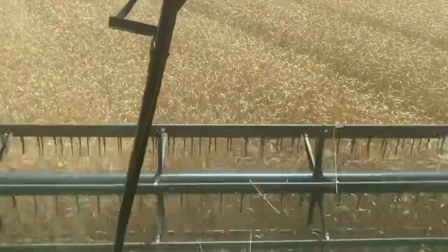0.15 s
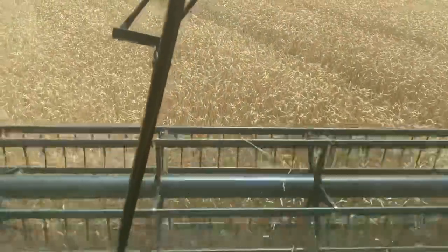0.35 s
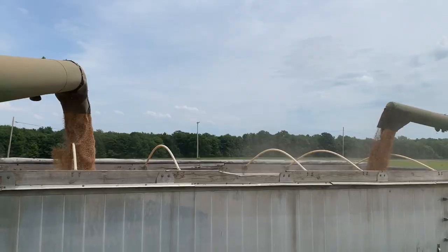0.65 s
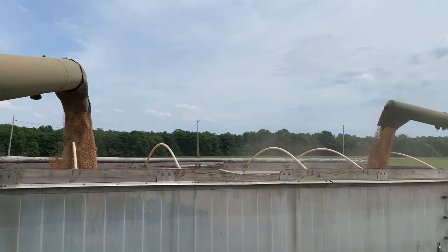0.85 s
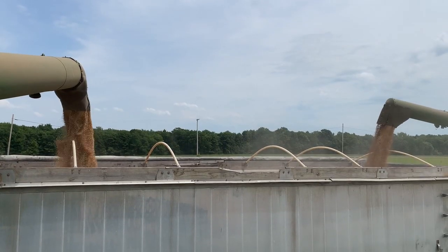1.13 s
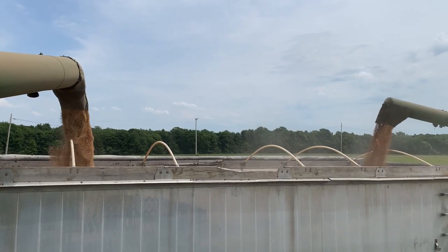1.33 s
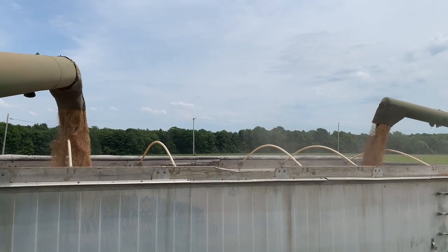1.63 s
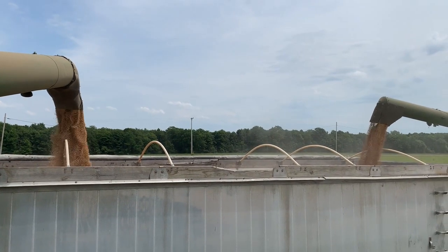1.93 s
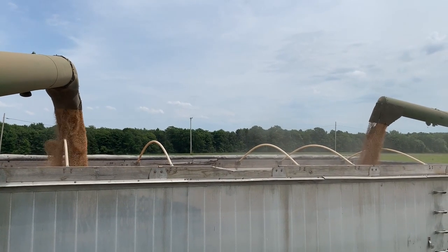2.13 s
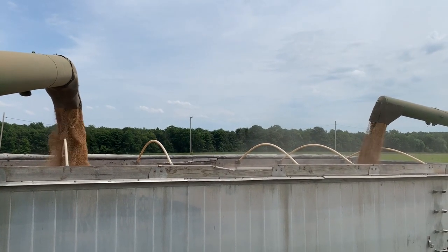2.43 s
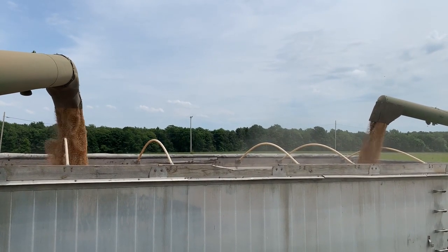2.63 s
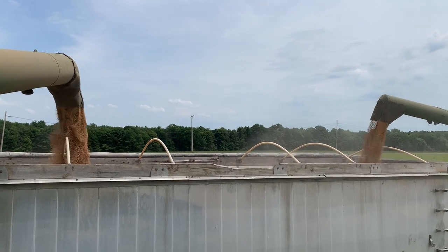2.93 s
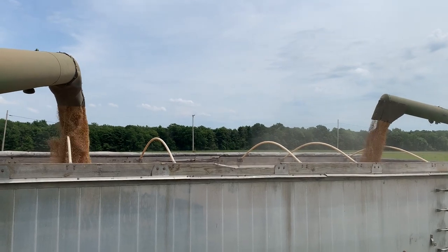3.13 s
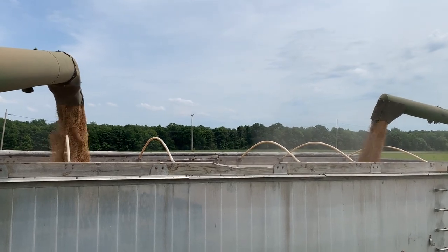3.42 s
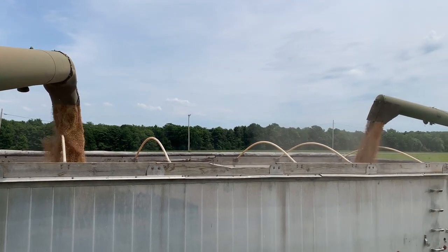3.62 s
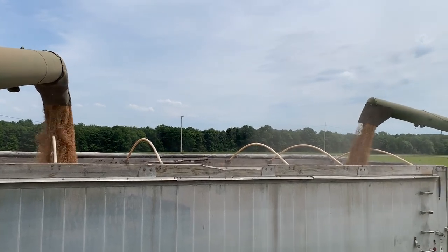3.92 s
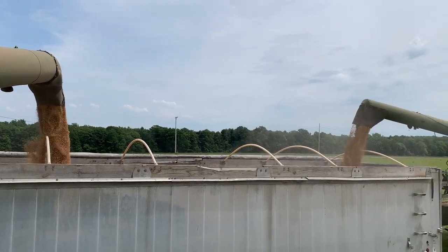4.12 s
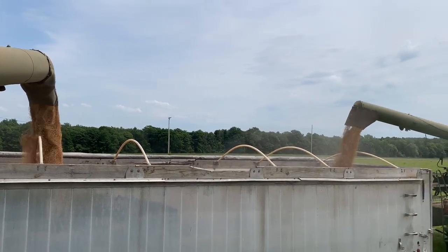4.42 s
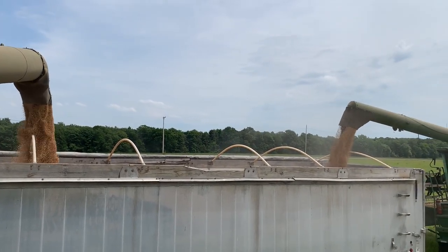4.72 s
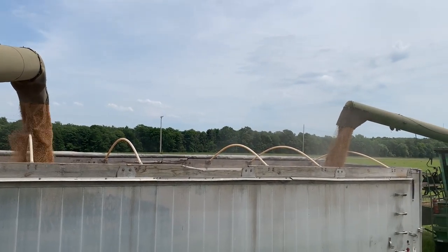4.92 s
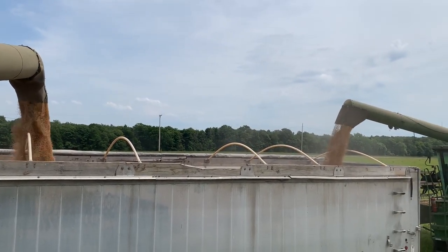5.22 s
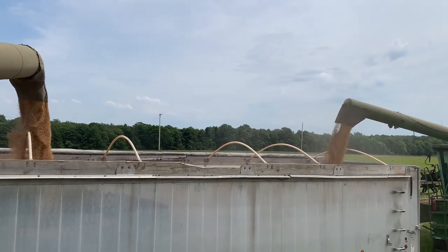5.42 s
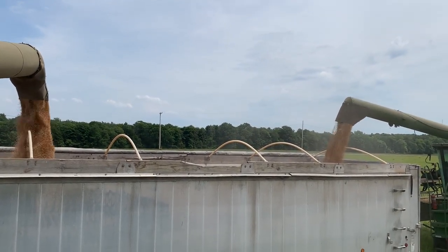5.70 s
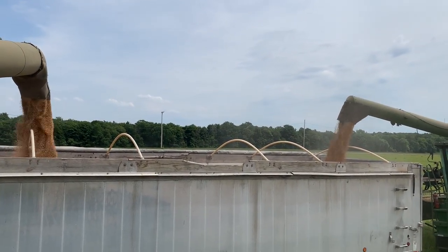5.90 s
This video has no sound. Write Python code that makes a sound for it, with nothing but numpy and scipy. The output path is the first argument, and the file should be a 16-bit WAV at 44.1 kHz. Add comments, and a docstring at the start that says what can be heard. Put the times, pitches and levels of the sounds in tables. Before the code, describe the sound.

For half a second, a muffled rumble with thin whines is heard inside a combine's cab. It cuts abruptly to an open field, beside a trailer that two combines are filling with wheat. Their unloading augers hum with a fast throb over steadily droning diesel engines. Grain scrapes and rings along the steel tubes with faint squeals, patters onto the heap and strikes the metal walls, continuing to the end.

```python
"""Two unloading augers hum at the tooth rates of their chain drives as two combines fill a trailer with wheat.
Each auger surges once a turn, and the unequal speeds make the surges beat. Kernels scrape and ring
along the steel tubes, patter onto the heap and strike the trailer's walls, over droning diesels.
The first half second is heard muffled inside a combine's cab, the rest outdoors beside the trailer."""
import sys
import numpy as np
from scipy import signal
from scipy.fft import rfft, irfft
from scipy.io import wavfile

SR = 44100
rng = np.random.default_rng(int(sys.argv[2]) if len(sys.argv) > 2 else 0)


def digitize_waveform(pressure):
    """Quantize a signal to 16-bit integers and store it at the path in sys.argv[1].

    Rows of a 2-D input are taken as channels; values are limited to [-1, 1].
    """
    field = np.atleast_2d(pressure).T
    bounded = np.clip(field, -1, 1)
    quanta = np.round(bounded * 32767).astype(np.int16)
    wavfile.write(sys.argv[1], SR, quanta)


N = 267025
TIME = np.arange(N) / SR
HZ = np.maximum(np.arange(N // 2 + 1) * SR / N, 1)

# left-right coherence outdoors: (frequency [Hz], coherence [-1 to 1])
FIELD_COHERENCE = [(80, .98), (150, .93), (260, .58), (400, .4), (700, .5), (950, .2), (1200, .55),
                   (1400, .55), (2200, .22), (3600, .1), (5000, .2), (6100, .15), (7300, .45), (8300, .96),
                   (8800, .96), (9500, .8), (10200, .4), (10800, .3), (11400, -.6), (12100, .55),
                   (13000, .9), (14300, .9), (15200, 0)]
# phase lead of the left channel outdoors: (frequency [Hz], lead [rad])
FIELD_LEAD = [(50, .15), (250, .25), (400, .85), (700, 1.6), (1200, 3.1), (1700, 3.6), (2200, 5.6),
              (3300, 9.3), (4400, 12.6), (5500, 15), (6800, 12.8), (8500, 9.4), (10800, 6.28)]
# level difference outdoors: (frequency [Hz], left minus right [dB])
FIELD_BALANCE = [(50, 1), (130, 2.6), (240, 1.8), (370, 5), (600, 4), (1000, 1), (2600, 1), (4200, 0),
                 (5700, -3), (7500, 0), (15000, 0)]
# left-right coherence in the cab: (frequency [Hz], coherence [-1 to 1])
CAB_COHERENCE = [(60, 1.0), (300, 0.59), (700, 0.053), (1300, 0)]
# rumble in the cab: (frequency [Hz], spectral density [dB re 1/Hz])
CAB_RUMBLE = [(10, -70), (22, -50), (40, -41.5), (70, -42), (110, -41), (175, -50.5), (300, -53.5),
              (450, -60.5), (800, -63.5), (980, -69), (1150, -71), (1600, -76.5), (2600, -76),
              (4300, -88.5), (8000, -98), (15000, -89.5)]
# hydraulic whines in the cab: (frequency [Hz], level [dB])
CAB_WHINES = [(140, -55), (502, -42), (737.5, -41), (848, -51)]
# contacts of a loose panel: (time [s], level [dB])
PANEL_CONTACTS = [(.216, -22), (.311, -30)]
# modes of that panel: (frequency [Hz], peak relative to the contact [dB])
PANEL_MODES = [(1085, -2), (1529, -13), (2008, -12), (2560, -14)]
# fans, exhausts and threshing gear: (frequency [Hz], spectral density [dB re 1/Hz])
ROAR_SPECTRUM = [(40, -59), (62, -52), (80, -40.5), (91, -46), (103, -40.5), (135, -41), (175, -47),
                 (260, -47.5), (300, -45), (340, -49.5), (430, -50), (510, -54.5), (950, -59), (1100, -58),
                 (1190, -60), (1280, -59.5), (2000, -66.5), (5000, -109)]
# cavity resonances of the trailer: (frequency [Hz], bandwidth [Hz], gain [dB])
TRAILER_MODES = [(611, 28, 2.5), (705, 14, 4), (806, 20, 6), (851, 9.8, 2.5), (950, 53, 3.5), (1058, 28, 4)]
# tones of engines, shafts and fans:
# (frequency [Hz], level before trim [dB], left minus right [dB], waver [rad of phase and dB of level])
ENGINE_TONES = [(71.5, -39, 2, .3), (187.1, -32.5, 2, .25), (225.2, -41, 2, .4), (239.2, -37.5, -2, .3),
                (241.8, -40, -2, .3), (253.4, -40, 1, .3), (557.6, -47.5, 4, .4), (753, -52, 2, .3),
                (794.7, -41, 2.5, .2), (931, -49, 2, .5), (1031.8, -46, -5, .4), (1082, -48, 5, .5),
                (1393.4, -49.5, 1, .35)]
# deep hum of each diesel: (frequency [Hz], level [dB])
DIESEL_HUMS = [(84.45, -22.3), (83.65, -35)]
# ringing of the trailer's walls: (frequency [Hz], spectral density [dB re 1/Hz])
WALL_SPECTRUM = [(1150, -65), (1600, -67), (2700, -68.5), (3400, -71), (4600, -70.5), (5600, -74)]
# kernels scraping in the tubes: (frequency [Hz], spectral density [dB re 1/Hz])
SCRAPE_SPECTRUM = [(300, -54.5), (900, -65), (1550, -69), (2200, -71), (2700, -67.5), (3300, -71),
                   (6000, -76.5), (12000, -99)]
# kernels landing on the heap: (frequency [Hz], spectral density [dB re 1/Hz])
PATTER_SPECTRUM = [(700, -67.5), (2500, -76), (3600, -71), (4250, -72), (4850, -71), (5250, -74),
                   (5700, -70.5), (6200, -67.5), (7700, -76.5), (12000, -102)]
# fine high hiss, strongest in three narrow bands: (frequency [Hz], spectral density [dB re 1/Hz])
HISS_SPECTRUM = [(4000, -88), (7000, -79), (8200, -74), (9400, -74), (9850, -66.5), (10500, -74),
                 (11200, -79), (12000, -73.5), (12850, -68.5), (13450, -81), (14200, -69.5), (15200, -77)]
# modes of the steel tubes: (frequency [Hz], level before trim [dB], share in a squeal [0-1])
TUBE_MODES = [(1243, -47, 0), (1285, -44.5, 0), (1438, -50, 0), (1558, -52, 0), (1662, -52, 0),
              (1835, -48.5, .3), (1905, -49.5, .3), (1993, -50, .2), (2050, -53, 0), (2368, -47.5, 1),
              (2396, -48.5, 1), (2422, -52, .7), (2465, -49.5, .6), (2635, -52, .2), (2812, -54, 0),
              (2922, -54, 0), (3135, -56, 0), (3450, -57, 0), (4175, -54.5, 0), (4285, -56, 0),
              (5195, -54.5, 0)]
# clumps of grain in the tubes: (time [s], added load [dB], squeal at full share [dB])
GRAIN_CLUMPS = [(0.91, .7, 3.5), (1.1, 0.6, 2.5), (1.24, -0.6, 1), (1.57, 0.5, 4), (1.69, 1, 4.5),
                (1.89, 1.5, 1.5), (2.19, 1.7, 2.5), (3.06, 1.2, 3), (3.39, 0, 3.5), (3.85, 1.4, 4),
                (4.03, 2.3, 3), (4.34, 0.8, 2.5), (4.57, 0.5, 0), (4.77, 2.1, 0), (5.06, 1, 0),
                (5.21, 1.6, 4.5), (6.02, 0, 4)]
# uneven running of the drive, once and twice a lap of a slack chain and once a turn of the slower shaft: (rate
# [Hz], time when furthest ahead [s], phase swing [rad], added bite [dB])
DRIVE_SWAY = [(.93, 1.345, .28, 0), (1.86, .82, .2, 2.8), (3.715, .68, .22, 1.1)]
# the augers: (turn rate [Hz], time of one surge [s], tooth rate [Hz], level before trim [dB],
# fall per harmonic [dB], surge depth [0-1], chain slack [0-1])
AUGER_DRIVES = [(6.043, .552, 139.02, -22.3, 5.5, .38, 1), (6.51, .622, 149.26, -28, 12, .2, 0)]
# chain hum: (harmonic [number], trim [dB], throb per unit surge depth [Np], lag of phase wobble [s])
CHAIN_HARMONICS = [(1, 2.5, 1.0, .02), (2, 3.0, .5, .0455), (3, 3.0, 1.74, -.022), (4, -6, .81, .0029)]

OUTDOORS_S, CUTOFF_HZ, WIND_FILTER_HZ = .4845, 15200, 48.6
BOOM_HZ, BOOM_DB, BOOM_THROB_DB = 115, -31, 7.5
ENGINE_LEAD_S = 0.000084  # the engines stand a little to the left
PANEL_T60_S, WALL_T60_S, TUBE_T60_S = .064, .11, .12
SHAFT_TURN_HZ, SHAFT_PUSH_S = 3.71, .565  # a slower shaft loads the drive twice a turn
GRIND_CEILING_DB = 2.1  # a full tube takes no more, even when both augers surge together
SQUEAL_FOLLOW = 2.2  # the squealing modes follow the load more closely than the rest


def from_db(db):
    """Amplitude grows tenfold for every 20 dB."""
    return 10 ** (np.asarray(db) / 20)


def over_hz(points):
    """A (frequency, value) table interpolated on a logarithmic frequency axis."""
    hz, value = np.transpose(points)
    return np.interp(np.log(HZ), np.log(hz), value)


def drift(corner_hz):
    """Low-passed noise gives a slow random fluctuation of unit variance."""
    step = 40  # samples per slow value
    pole = np.exp(-2 * np.pi * corner_hz * step / SR)
    slow = signal.lfilter([1], [1, -2 * pole, pole * pole], rng.standard_normal(N // step + 2002))[2000:]
    return np.interp(np.arange(N) / step, np.arange(len(slow)), (slow - slow.mean()) / slow.std())


def swing(hz, peak_s):
    """Sinusoidal modulation with a crest at the given time."""
    return np.cos(2 * np.pi * hz * (TIME - peak_s))


def tone(phase, db, pan_db, lead):
    """Level and phase differences between left and right localise a sinusoid of given rms level."""
    side = np.array([[.5], [-.5]])
    return np.sqrt(2) * from_db(db + side * pan_db) * np.cos(phase + side * lead)


def colour(white, spectrum_db, coherence, lead, pan_db):
    """Two independent white signals, filtered and mixed as mid and side, set spectrum and coherence."""
    first, second = rfft(white)
    coherence = np.clip(coherence, -.995, .995)
    mid, side = np.sqrt((1 + coherence) / 2) * first, np.sqrt((1 - coherence) / 2) * second
    leftward = from_db(pan_db / 2) * np.exp(.5j * lead)
    stereo = np.array([(mid + side) * leftward, (mid - side) / leftward])
    return irfft(stereo * from_db(spectrum_db) * np.sqrt(SR / 2), N)


def in_field(white, spectrum_db):
    """Coherence sets stereo width per band: centred bass, wide middle, treble by turns narrow and wide."""
    return colour(white, spectrum_db, over_hz(FIELD_COHERENCE), over_hz(FIELD_LEAD), over_hz(FIELD_BALANCE))


def impacts(per_s, flow, spread_db):
    """Shot noise of unit rms: impulses of uneven size arrive at random, at the rate per_s times flow."""
    sizes = from_db(spread_db * np.minimum(rng.exponential(1, (2, N)), 5)) * rng.choice([-1, 1], (2, N))
    clicks = sizes * (rng.random((2, N)) < per_s * flow / SR)
    return clicks / clicks.std()


def ring(strikes, hz, t60_s):
    """A damped mode answers each impulse with an exponentially decaying sinusoid."""
    radius, angle = from_db(-60 / (t60_s * SR)), 2 * np.pi * hz / SR
    return signal.lfilter([1, 0, -1], [1, -2 * radius * np.cos(angle), radius * radius], strikes)


def panel_ticks(contact_s=.0027):
    """Impact excitation: a loose panel chatters against its frame and rings in its modes."""
    out = 0
    for at, db in PANEL_CONTACTS:
        contact = np.exp(-.5 * ((TIME - at) / contact_s) ** 2)
        chatter = impacts(per_s=2600, flow=1, spread_db=5.0) * contact + 1e-18
        for hz, mode_db in PANEL_MODES:
            ringing = ring(chatter, hz, PANEL_T60_S)
            out = out + from_db(db + mode_db) * ringing / np.abs(ringing).max()
    return out


def cab(waver_rad=.71, flutter_db=.5):
    """Transmission loss: behind glass only rumble, a throbbing boom, whines and a ticking panel remain."""
    white = rng.standard_normal((2, N))
    rumble = colour(white, over_hz(CAB_RUMBLE), over_hz(CAB_COHERENCE), lead=0, pan_db=.5)
    boom_db = BOOM_DB + BOOM_THROB_DB * swing(hz=3.4, peak_s=.05)
    boom = tone(2 * np.pi * BOOM_HZ * TIME, boom_db, pan_db=8.0, lead=.2)
    whines = 0
    for hz, db in CAB_WHINES:
        phase = 2 * np.pi * hz * TIME + waver_rad * drift(2.5)
        whines = whines + tone(phase, db + flutter_db * drift(8.2), pan_db=5.0, lead=.37)
    return rumble + boom + whines + panel_ticks()


def machinery_roar(grind_db, follow=.18):
    """Cavity resonance: the hollow trailer colours broadband noise that swells slightly with the load."""
    peaks = sum((from_db(db) - 1) / (1 + (2 * (HZ - hz) / width) ** 2) for hz, width, db in TRAILER_MODES)
    noise = rng.standard_normal((2, N)) * from_db(follow * grind_db)
    return in_field(noise, over_hz(ROAR_SPECTRUM) + 20 * np.log10(1 + peaks))


def engine_drone(trim_db=.4):
    """Governed engines hold their pitch; moving air modulates each tone in phase and amplitude."""
    out = 0
    for hz, db, pan_db, waver in ENGINE_TONES:
        phase = 2 * np.pi * (hz * TIME + rng.random()) + waver * drift(2.4)
        lead = 2 * np.pi * hz * ENGINE_LEAD_S
        out = out + tone(phase, db + trim_db + waver * drift(5.6), pan_db, lead)
    return out


def diesel_hum(in_step_s=.92, pan_db=2.1):
    """Beats: two diesels run at almost one speed, so their summed hum slowly swells and ebbs."""
    return sum(tone(2 * np.pi * hz * (TIME - in_step_s), db, pan_db, lead=2 * np.pi * hz * ENGINE_LEAD_S)
               for hz, db in DIESEL_HUMS)


def wall_rings(grind_db, low_hz=1150, high_hz=5600, modes=56):
    """High modal density: each stray kernel rings one of the close modes of the trailer's sheet walls."""
    hits = impacts(per_s=650, flow=from_db(grind_db), spread_db=1.0)
    struck_mode = rng.integers(0, modes, N)
    pitches = low_hz + (high_hz - low_hz) * (np.arange(modes) + rng.random(modes)) / modes
    out = sum(ring(hits * (struck_mode == k) + 1e-9 * TIME, hz, WALL_T60_S) for k, hz in enumerate(pitches))
    band_share = (high_hz - low_hz) / (SR / 2)
    return in_field(out / out.std() * np.sqrt(band_share), over_hz(WALL_SPECTRUM))


def grain_stream(grind_db):
    """Dense impacts merge into noise: kernels scrape in surges and land steadily; a high hiss flickers."""
    scrape = impacts(per_s=7000, flow=from_db(2.4 * grind_db), spread_db=3.0)
    patter = impacts(per_s=14000, flow=from_db(.29 * grind_db), spread_db=2.0)
    hiss = impacts(per_s=12000, flow=from_db(.25 * grind_db + 3.0 * drift(30)), spread_db=.5)
    return (in_field(scrape, over_hz(SCRAPE_SPECTRUM)) + in_field(patter, over_hz(PATTER_SPECTRUM))
            + in_field(hiss, over_hz(HISS_SPECTRUM)))


def tube_rings(grind_db, squeal_db, follow=2.4, trim_db=3.0):
    """Random excitation: grain keeps the steel tubes' modes ringing, most densely in surges and squeals."""
    out = 0
    for hz, db, share in TUBE_MODES:
        flow = from_db((follow + share * SQUEAL_FOLLOW) * grind_db + 2 * share * squeal_db)
        ringing = ring(impacts(per_s=130, flow=flow, spread_db=1.0), hz, TUBE_T60_S)
        out = out + from_db(db) * ringing / ringing.std()
    return in_field(out / np.sqrt(SR / 2), trim_db)


def load_db(surge_db, lag_s, shaft_db, twice_a_turn_db):
    """Superposition: the augers' surges pass in and out of step, and the slow shaft adds its pushes."""
    surges = sum(depth * swing(turn_hz, at + lag_s) for turn_hz, at, _, _, _, depth, _ in AUGER_DRIVES)
    shaft = shaft_db * swing(SHAFT_TURN_HZ, SHAFT_PUSH_S)
    return surge_db * surges + shaft + twice_a_turn_db * swing(2 * SHAFT_TURN_HZ, SHAFT_PUSH_S)


def grain_friction(clump_width_s=.028):
    """Saturation limits the screws' pressure on the grain; passing clumps add load and squeal, in dB."""
    uneven_feed_db = .5 * drift(7.0)
    feed_db = load_db(surge_db=3.5, lag_s=.018, shaft_db=.9, twice_a_turn_db=.7) + uneven_feed_db
    grind_db, squeal_db = GRIND_CEILING_DB * np.tanh(feed_db / GRIND_CEILING_DB), 0
    for at, clump_db, clump_squeal_db in GRAIN_CLUMPS:
        passing = np.exp(-.5 * ((TIME - at) / clump_width_s) ** 2)
        grind_db = grind_db + clump_db * passing
        squeal_db = squeal_db + clump_squeal_db * passing
    return grind_db, squeal_db


def tooth_bite():
    """Harder contact strengthens overtones: spectral tilt in dB per natural log of harmonic number."""
    load = load_db(surge_db=1.5, lag_s=.0061, shaft_db=-.16, twice_a_turn_db=1.1) + drift(9.9)
    uneven_drive = sum(db * swing(hz, at) for hz, at, _, db in DRIVE_SWAY)
    worn_teeth = 2 * drift(32)
    return load + uneven_drive + worn_teeth


def auger_hum(in_step_s=.551, wobble=1.3, waver_rad=.12):
    """Teeth meshing with a chain give a harmonic series; surges and slack modulate its level and phase."""
    out, bite = 0, tooth_bite()
    sway = sum(radians * swing(hz, at) for hz, at, radians, _ in DRIVE_SWAY)
    for turn_hz, surge_s, tooth_hz, db, fall_db, depth, slack in AUGER_DRIVES:
        mesh_phase = 2 * np.pi * tooth_hz * (TIME - in_step_s) + slack * sway + waver_rad * drift(8.8)
        for k, trim_db, throb, lag_s in CHAIN_HARMONICS:
            phase = k * mesh_phase + wobble * depth * swing(turn_hz, surge_s + lag_s)
            swell = np.exp(throb * depth * swing(turn_hz, surge_s)) * from_db(np.log(k) * bite)
            swell /= np.sqrt(np.mean(swell ** 2))
            lead = np.interp(k * tooth_hz, HZ, over_hz(FIELD_LEAD))
            out = out + swell * tone(phase, db - (k - 1) * fall_db + trim_db, pan_db=4.5, lead=lead)
    return out


def scene():
    """An equal-power crossfade of 5 ms leads from the cab to the field, whose deepest bass is filtered."""
    grind_db, squeal_db = grain_friction()
    machines = auger_hum() + diesel_hum() + engine_drone() + machinery_roar(grind_db)
    wheat = grain_stream(grind_db) + tube_rings(grind_db, squeal_db) + wall_rings(grind_db)
    wind_filter = signal.butter(3, WIND_FILTER_HZ, "high", fs=SR, output="sos")
    field = signal.sosfilt(wind_filter, machines + wheat)
    fade_in = np.sin(np.pi / 2 * np.clip(TIME / .004, 0, 1)) ** 2
    outside = np.clip((TIME - OUTDOORS_S) / .005, 0, 1)
    return np.sqrt(outside) * field + np.sqrt(1 - outside) * fade_in * cab()


def record(dry):
    """Soft saturation rounds the highest peaks, and a steep low-pass filter limits the bandwidth."""
    rounded = dry / (1 + (dry / .95) ** 8) ** (1 / 8)
    return signal.sosfilt(signal.ellip(10, .1, 90, CUTOFF_HZ, fs=SR, output="sos"), rounded)


dry = scene()
out = record(dry)
digitize_waveform(out)
```